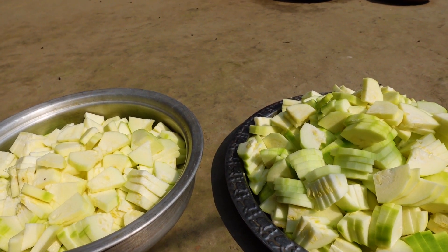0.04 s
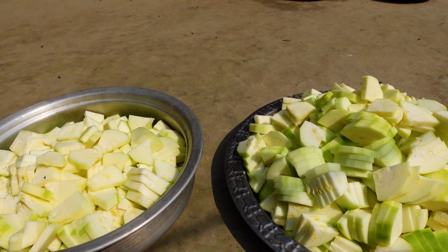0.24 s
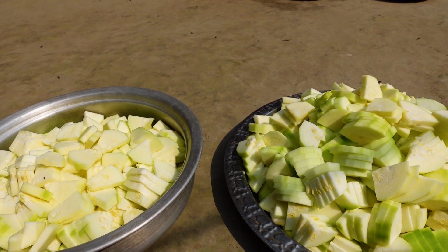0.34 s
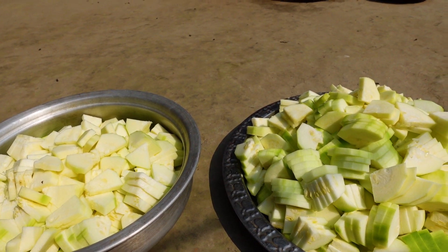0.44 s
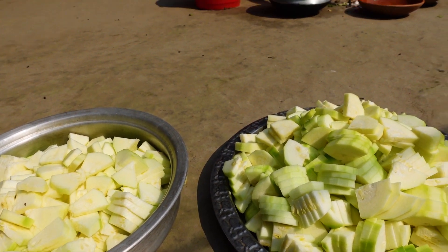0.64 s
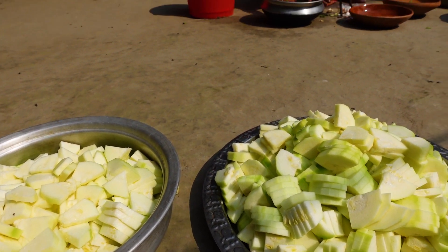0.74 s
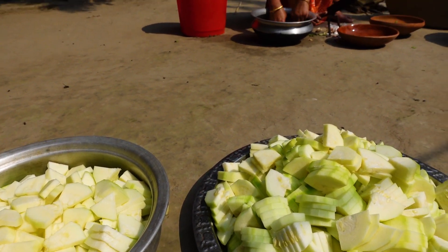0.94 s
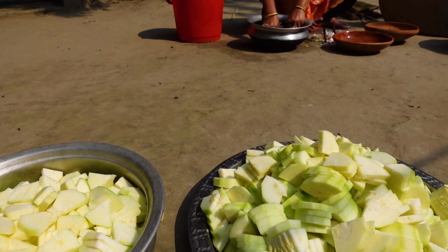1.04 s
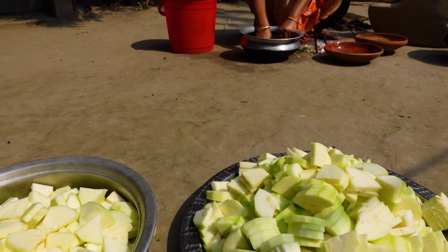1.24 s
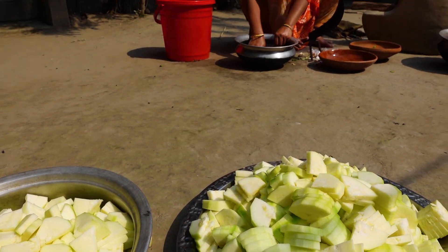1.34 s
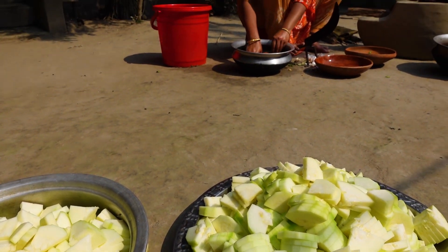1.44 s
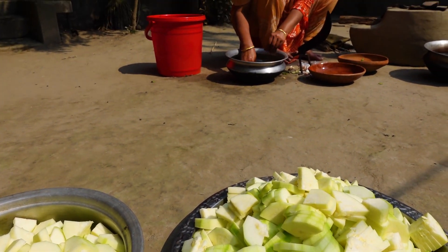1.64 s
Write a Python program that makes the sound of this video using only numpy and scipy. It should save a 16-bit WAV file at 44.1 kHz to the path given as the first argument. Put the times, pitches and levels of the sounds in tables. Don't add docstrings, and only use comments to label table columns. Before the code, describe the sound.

Water and hard bits stirred in a metal pot, slightly right of centre; two main bursts of knocks, bubbles and fine spray, then small drips and bangle clinks, over soft outdoor hiss heard in stereo.

```python
import sys
import numpy as np
from scipy import signal
from scipy.fft import rfft, irfft
from scipy.io import wavfile

SR = 44100
rng = np.random.default_rng(int(sys.argv[2]) if len(sys.argv) > 2 else 0)


def transcribe(u):
    v = np.clip(np.atleast_2d(u).T, -1, 1)
    q = np.round(v * 32767).astype(np.int16)
    wavfile.write(sys.argv[1], SR, q)


def magnitude_from_level(level_db):
    exponent = np.asarray(level_db, float) / 20
    return 10 ** exponent


N = 74970
HIT_N = 6000
KNOCK_FADE_DB, SCRAPE_FADE_DB = 16.5, 7
POT_PAN_DB, WATER_PAN_DB = -3.1, -2


def in_time(rows):
    times, *columns = np.transpose(rows)
    return [np.interp(np.arange(N) / SR, times, column) for column in columns]


def at_hz(points, hz):
    point_hz, point_db = np.array(points).T
    return np.interp(np.log(hz), np.log(point_hz), point_db, left=-90, right=-90)


def rms_one(x):
    return x / np.sqrt(np.mean(x ** 2))


def drift(rate):
    return np.interp(np.arange(N) / SR * rate, np.arange(100), rng.standard_normal(100))


def pan(x, db):
    return x * magnitude_from_level(np.array([[db / 2], [-db / 2]]))


def ring(clicks, hz, t60):
    radius = magnitude_from_level(-60 / (t60 * SR))
    angle = 2 * np.pi * hz / SR
    poles = [1, -2 * radius * np.cos(angle), radius * radius]
    return signal.lfilter([0, np.sin(angle)], poles, clicks + 1e-18)


def contacts(body, db, length, centre_hz, width, fade_db):
    contacts_per_s, contact_spread_db = 2800, 2.5
    crack_db, spit_db, skirt_db = -9, -14, -19
    t = np.arange(HIT_N) / SR
    chance = rng.random(HIT_N)
    size = rng.exponential(1, HIT_N)
    luck = rng.standard_normal((15, HIT_N))

    hit = (chance < contacts_per_s / SR) | (t == 0)
    size = np.where(t == 0, 3, np.minimum(size, 3))
    gate = np.clip((length - t) * SR / 40, 0, 1)
    clicks = hit * gate * magnitude_from_level(contact_spread_db * size - fade_db * t / length)

    modes = 0
    for k, (hz, level, t60) in enumerate(body):
        strikes = clicks * np.sign(luck[k]) * magnitude_from_level(4.1 * luck[k, ::-1])
        octaves = np.log2(hz / centre_hz)
        weight = magnitude_from_level(skirt_db) + magnitude_from_level(level - 11.4 * (octaves / width) ** 2)
        modes = modes + rms_one(ring(strikes, hz, min(t60, .04))) * weight

    spit = signal.lfilter([1], [1, -.96], clicks) * luck[-1]
    edge = 2 ** np.clip(width, .1, 1.2)
    crack_band = [centre_hz / edge, min(centre_hz * edge, SR * .45)]
    crack = signal.sosfilt(signal.butter(2, crack_band, "band", fs=SR, output="sos"), spit)
    dull_spit = signal.lfilter([1, 1], [1, -.7], spit)
    run = rms_one(modes) + magnitude_from_level(crack_db) * rms_one(crack) + magnitude_from_level(spit_db) * rms_one(dull_spit)
    return magnitude_from_level(db - 8) * run / run[:int(length * SR) + 90].std()


def rattles():
    # pitch in Hz, level in dB, t60 in seconds.
    wall = [(1160, 8, 0.042), (1740, 8, 0.016), (2640, 4, 0.017), (3070, 5.5, 0.035), (3320, 0.5, 0.04),
            (3810, 1, 0.039), (4318, 2, 0.024), (4460, 1, 0.04), (5143, 5, 0.017), (5600, -4, 0.036),
            (6050, 0.5, 0.026), (6570, 0.5, 0.027), (7390, 1, 0.025), (8660, 2.5, 0.012)]
    # start in seconds, level in dB, length in seconds, centre in Hz, width in octaves.
    knocks = [(.2443, -14, 0.009, 5010, 0.22), (.2444, -22.5, 0.0075, 7800, 0.57),
              (.2535, -26, 0.0035, 5500, 0.46), (.2575, -21, 0.0053, 5100, 0.56),
              (.280, -23, 0.0076, 4850, 0.68), (.294, -26, 0.0042, 4370, 0.15),
              (.328, -26, 0.0076, 4900, 0.55), (.4452, -34, 0.015, 6300, 1.1),
              (.4727, -42, 0.0024, 5530, 0.2), (.4748, -32, 0.0032, 5500, 1.3),
              (1.0892, -35.5, 0.0083, 9800, 0.34), (1.0893, -23.5, 0.01, 4100, 1.6),
              (1.098, -42, 0.0053, 4800, 0.86), (1.114, -38, 0.0069, 8000, 1.2),
              (1.2165, -31, 0.0029, 4650, 0.4), (1.602, -39.5, 0.0027, 2470, 0.17)]
    # start in seconds, level in dB, length in
    # seconds, centre in Hz, width in octaves.
    scrapes = [(.250, -27, 0.065, 3660, 1.5), (.293, -34.5, 0.032, 1740, 0.083),
               (.310, -35, 0.035, 2640, 0.08), (.320, -42, 0.052, 1110, 0.3),
               (.315, -28.5, 0.036, 4500, 0.52), (.284, -26.5, 0.015, 4420, 0.12),
               (.357, -36.5, 0.064, 2970, 1.17), (.4465, -30, 0.0073, 2640, 0.092),
               (.447, -30, 0.013, 3320, 0.063), (.464, -34.5, 0.0062, 2700, 0.091),
               (.550, -40, 0.023, 3420, 0.95), (.712, -42.5, 0.031, 3170, 0.37),
               (.7925, -28, .018, 4450, 0.91), (1.116, -32, 0.0085, 2800, 0.9),
               (1.153, -47, 0.0082, 4000, 0.59), (1.2185, -32.5, 0.0085, 3300, 0.72),
               (1.265, -41, 0.018, 2460, 1.4), (1.31, -45, 0.062, 2680, 0.28),
               (1.419, -34, 0.013, 3120, 0.15), (1.448, -40.5, 0.021, 3460, 0.081),
               (1.512, -39.5, 0.007, 3200, 0.071), (1.657, -41, 0.0091, 3100, .5),
               (1.665, -35.5, 0.016, 3200, 0.69)]
    out = np.zeros(N + HIT_N)
    for rows, fade_db in (knocks, KNOCK_FADE_DB), (scrapes, SCRAPE_FADE_DB):
        for start, *row in rows:
            i = int(start * SR)
            out[i:i + HIT_N] += contacts(wall, *row, fade_db)
    return signal.sosfilt(signal.butter(4, 930, "high", fs=SR, output="sos"), out[:N])


def drips():
    # start in seconds, pitch
    # in Hz, level in dB, t60 in seconds.
    bubbles = [(.249, 716, -45, 0.41), (0.526, 1133, -50.5, 0.092), (1.013, 1605, -43.5, 0.068),
               (1.062, 2070, -34, 0.014), (1.071, 1700, -34.5, 0.03), (1.074, 734, -34.5, 0.071),
               (1.081, 1650, -24.5, 0.015), (1.09, 1123, -27, 0.05), (1.099, 1620, -20, 0.016),
               (1.117, 970, -31.5, 0.042), (1.132, 1014, -34.5, 0.05), (1.180, 2630, -23.5, 0.022),
               (1.187, 934, -37, 0.078), (1.203, 1234, -27.5, 0.04), (1.224, 963, -28.5, 0.013),
               (1.271, 1187, -41.5, 0.12), (1.320, 1628, -35.5, 0.076), (1.336, 895, -35.5, 0.12),
               (1.351, 1420, -32.5, 0.018), (1.515, 770, -45, 0.086), (0.319, 1716, -27, .04),
               (0.326, 1740, -27.5, 0.054), (0.336, 1660, -26.5, 0.048), (0.334, 2800, -27, 0.028),
               (.343, 2600, -29, 0.027), (.343, 1120, -37.5, .05), (.352, 2620, -31, 0.018),
               (.362, 3100, -37, 0.025), (.393, 2640, -34, 0.033), (.404, 2700, -33, 0.011),
               (1.270, 2650, -37, .02), (1.320, 2920, -42, 0.026), (1.341, 2600, -42, .03),
               (1.349, 2600, -36.5, 0.038), (1.366, 5600, -40, .015), (1.377, 7000, -44, 0.013),
               (1.4235, 2080, -38.5, 0.034), (1.4235, 2880, -28.5, 0.021), (1.452, 3440, -36, .025),
               (1.495, 1680, -53, 0.048)]
    # start in seconds, pitch in Hz, level in dB,
    # t60 in seconds.
    pops = [(.4455, 6570, -32, .012), (0.453, 6700, -36, .012), (.4525, 5130, -36, .015),
            (0.4557, 2640, -28, 0.027), (0.457, 3400, -29, 0.011), (0.4731, 5480, -31, .012),
            (0.474, 4330, -30.5, 0.0079), (.481, 6890, -33, .008), (.481, 9920, -29.5, 0.0089),
            (.481, 11600, -35, 0.0088), (0.7923, 4170, -28.5, 0.052), (.802, 4440, -31.5, .04),
            (.801, 3250, -32.5, 0.041), (0.793, 1500, -45, 0.065), (.795, 1850, -42, 0.064),
            (1.0897, 4414, -17, 0.03), (1.0894, 5020, -18, 0.019), (1.0896, 2880, -17, 0.027),
            (1.099, 5500, -24, .008), (1.110, 10600, -34, .006), (1.1145, 4860, -20, 0.0064),
            (1.1178, 2640, -21.5, 0.012), (1.1195, 4400, -31, 0.021), (1.124, 2580, -32, .03),
            (1.2171, 5080, -30.5, 0.017), (1.2182, 4180, -26, 0.011), (1.2191, 2890, -24, 0.019)]
    rise_per_t60, swell_cycles, burst_s, wobble = 0.081, 0.75, .04, .3
    out = np.zeros(N + 12000)
    t = np.arange(4000) / SR
    burst = np.clip((burst_s - t) * 200, 0, 1)
    for start, hz, db, t60 in bubbles + pops:
        phase = 2 * np.pi * hz * (t + rise_per_t60 * t * t / t60 / 2)
        turns = t * hz / 8
        wander = np.interp(turns, np.arange(200), rng.standard_normal(200))
        uneven = 1 + wobble * wander * np.minimum(turns, 1)
        swell = 1 - np.exp(-t * hz / swell_cycles)
        i = int(start * SR)
        out[i:i + 4000] += magnitude_from_level(db - 60 * t / t60) * swell * burst * uneven * np.sin(phase)
    return out[:N]


def ticks():
    # pitch in Hz, level in dB, t60 in seconds.
    bangle = [(4750, 4, 0.025), (5460, 1.5, 0.0065), (6800, -6, 0.006), (7400, -14, 0.0044),
              (8300, -16, 0.0065), (9030, 2, 0.006), (10200, -11, 0.0051), (12300, -22, .01),
              (13400, 3, 0.0081)]
    tick_starts = [.4815, 1.033, 1.378, 1.4237, 1.4405, 1.163, 1.262, 1.321]
    # level in dB, left over right in dB, centre in Hz, width in octaves.
    tick_rows = [
        (-41, 9, 9600, 0.2),
        (-44, -6, 10700, 0.26),
        (-41, -4, 11000, 0.12),
        (-21.5, 10.5, 7500, 1.4),
        (-35.5, 18, 6600, 1.5),
        (-41, 1, 10000, .4),
        (-44, 2.5, 11000, .6),
        (-45, 2.5, 11000, .8),
    ]
    out = np.zeros((2, N + HIT_N))
    for start, (db, pan_db, centre_hz, width) in zip(tick_starts, tick_rows):
        i = int(start * SR)
        tick = contacts(bangle, db, .004, centre_hz, width, KNOCK_FADE_DB)
        out[:, i:i + HIT_N] += pan(tick, pan_db)
    return signal.sosfilt(signal.butter(4, 4200, "high", fs=SR, output="sos"), out[:, :N])


def slosh():
    # time in seconds, level in dB.
    slosh_level = [(0, -60.5), (.245, -58.5), (.265, -56), (.36, -43.5), (.43, -49.5), (.6, -56),
                   (.75, -57.5), (.83, -50.5), (.98, -58.5), (1.07, -47), (1.12, -38.5), (1.2, -46.5),
                   (1.36, -47), (1.4, -52.5), (1.47, -54), (1.56, -53.5), (1.7, -56)]
    fizz_per_s, fizz_cycles, low_hz, high_hz, spread_db = 4000, 30, 800, 9000, 2.5
    sizes = magnitude_from_level(spread_db * np.minimum(rng.exponential(1, N), 4)) * rng.choice([-1, 1], N)
    born = rng.random(N) < fizz_per_s * magnitude_from_level(4 * drift(30)) / SR
    dealt = rng.integers(0, 40, N)
    tune = rng.random(40)
    side = rng.standard_normal(40)
    pitches = low_hz * (high_hz / low_hz) ** ((np.arange(40) + tune) / 40)
    rings = 0
    for k, hz in enumerate(pitches):
        octaves = np.log2(hz / 3200)
        weight = magnitude_from_level(-3 * octaves ** 2 + 1.53 * octaves)
        bubbles = ring(sizes * born * (dealt == k), hz, fizz_cycles / hz)
        rings = rings + pan(bubbles * weight, POT_PAN_DB + 3 * side[k])
    return magnitude_from_level(in_time(slosh_level)[0]) * rms_one(rings)


def bed(spectrum, patchy_db):
    # frequency in Hz, likeness from 0 to 1.
    likeness = [(60, 0.98), (125, 1), (250, 0.91), (600, 0.46), (2000, 0.18), (6000, 0.61), (14000, 0.68)]
    hz = np.clip(np.arange(N // 2 + 1) * SR / N, 1, None)
    like_hz, like = np.array(likeness).T
    alike = np.clip(np.interp(np.log(hz), np.log(like_hz), like), 0, 1)
    colour = magnitude_from_level(at_hz(spectrum, hz))
    mid, side = (rfft(rng.standard_normal(N) * magnitude_from_level(patchy_db * drift(7.72))) * colour for _ in range(2))
    return rms_one(irfft(np.sqrt(1 + alike) * mid + np.sqrt(1 - alike) * side * [[1], [-1]], N))


def spray():
    # time in seconds, level in dB.
    spray_level = [
        (0, -73),
        (.245, -58),
        (.28, -45),
        (.5, -59),
        (.7, -54),
        (.9, -52.5),
        (1.1, -51),
        (1.3, -55.5),
        (1.46, -51.5),
        (1.7, -56.5),
    ]
    # frequency in Hz, level in dB per Hz.
    spray_colour = [(2500, 0.5), (6000, -2.5), (10000, -2.5), (16000, -10.5)]
    return magnitude_from_level(in_time(spray_level)[0]) * bed(spray_colour, patchy_db=2.0)


def cock():
    # time in seconds, pitch in Hz, level in dB.
    crow = [
        (.53, 1470, -79),
        (.56, 1465, -47),
        (.60, 1465, -57),
        (.64, 1451, -50.5),
        (.77, 1463, -56),
        (.88, 1442, -61),
        (.98, 1433, -51),
        (1.01, 1400, -57),
    ]
    hz, db = in_time(crow)
    flutter_db = 1.9 * drift(38.5)
    waver = 1 + 0.0038 * drift(51.2)
    return magnitude_from_level(db - 4 + flutter_db) * np.sin(2 * np.pi * np.cumsum(hz * waver) / SR)


def yard_air():
    # frequency in Hz, level in dB per Hz.
    air_colour = [(290, -15.5), (500, -10.5), (613, -5), (1340, -8.5), (1600, -11.5), (2010, -12),
                  (2650, -8.5), (6610, -9.5), (16000, -23)]
    return magnitude_from_level(-52) * bed(air_colour, patchy_db=-2.2)


def yard_hum():
    # frequency in Hz, level in dB per Hz.
    hum_colour = [(25, -48), (60, -10.5), (95, -1.5), (125, 1), (160, -5.5), (210, -2.5), (320, -11),
                  (550, -22)]
    return magnitude_from_level(-52.5) * bed(hum_colour, patchy_db=1.96)


def scene():
    pot = pan(rattles(), POT_PAN_DB) + pan(drips(), WATER_PAN_DB)
    hands = ticks() + slosh() + spray()
    return pot + hands + cock() + yard_air() + yard_hum()


def low_pass(x):
    return signal.sosfilt(signal.butter(12, 16820, fs=SR, output="sos"), x)


def record(dry):
    top_cut = signal.sosfilt(signal.cheby2(10, 32, 15900, fs=SR, output="sos"), dry)
    mix = signal.sosfilt(signal.butter(2, 45, "high", fs=SR, output="sos"), top_cut)
    return low_pass(mix)


dry = scene()
out = record(dry)
transcribe(out)
```